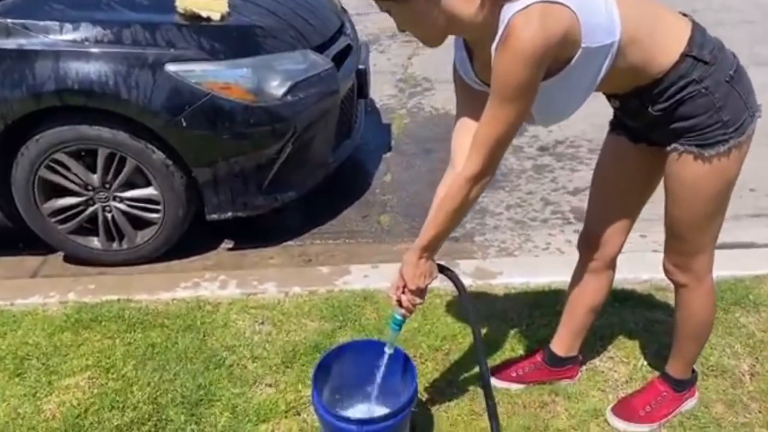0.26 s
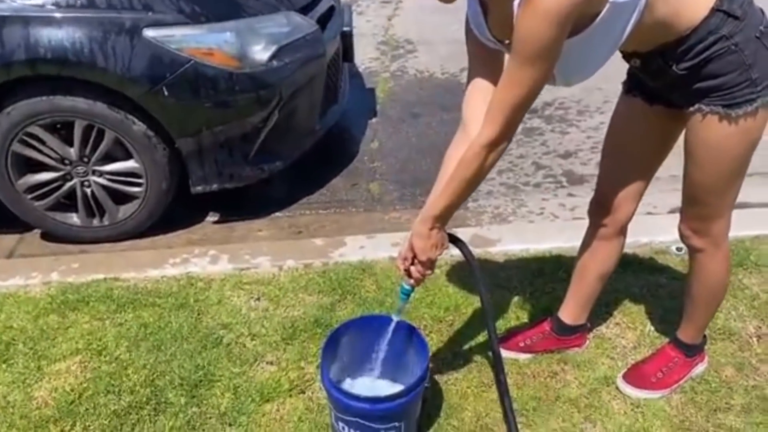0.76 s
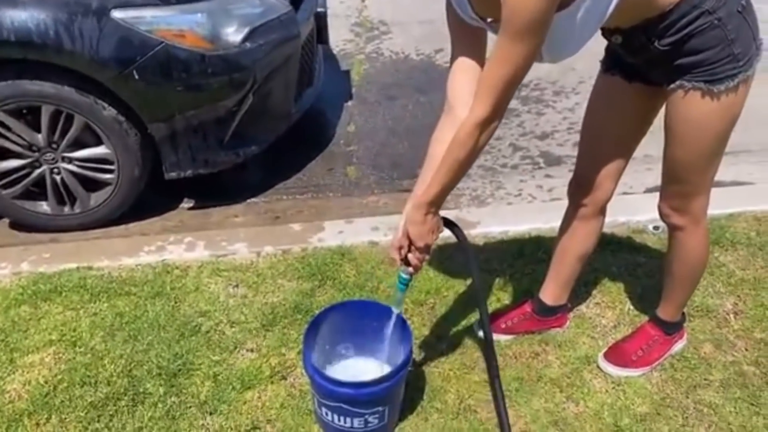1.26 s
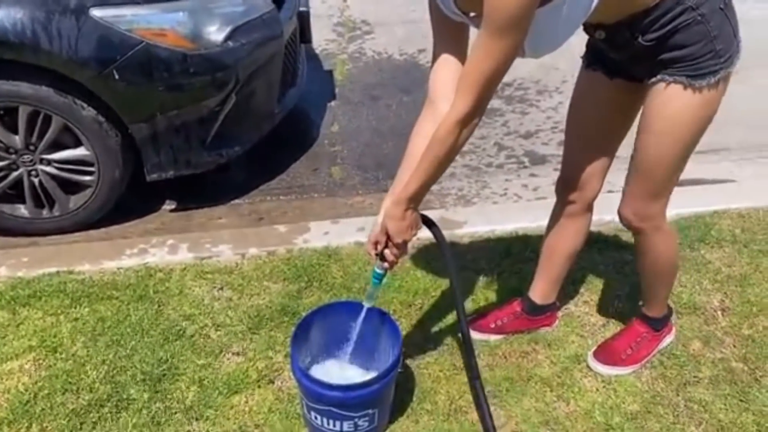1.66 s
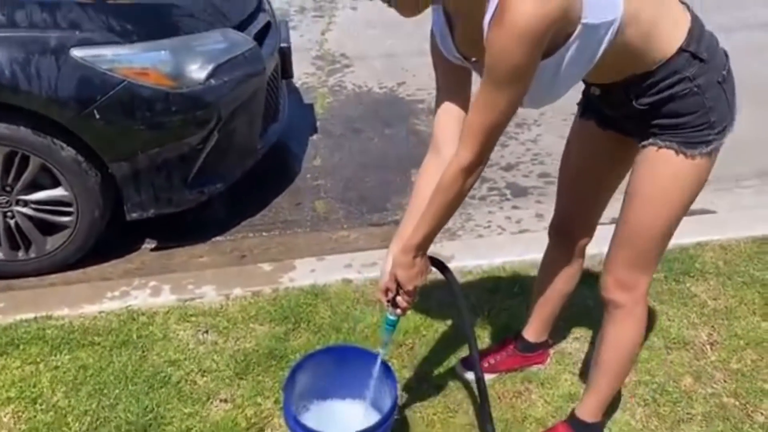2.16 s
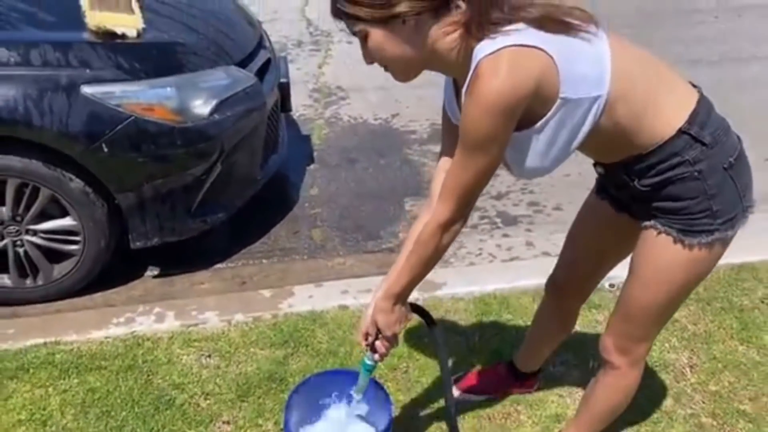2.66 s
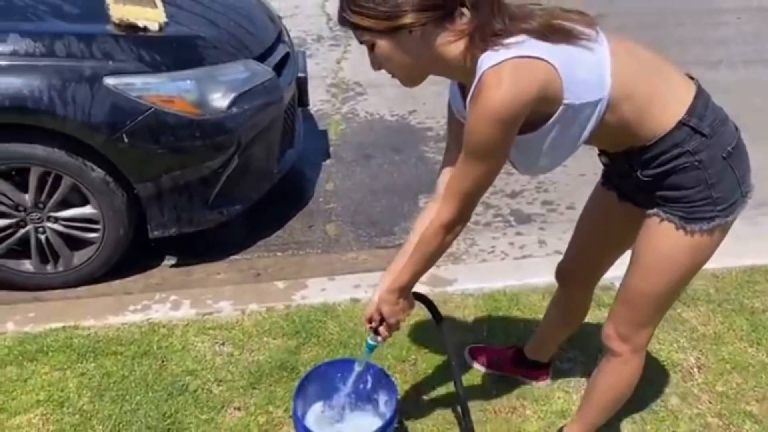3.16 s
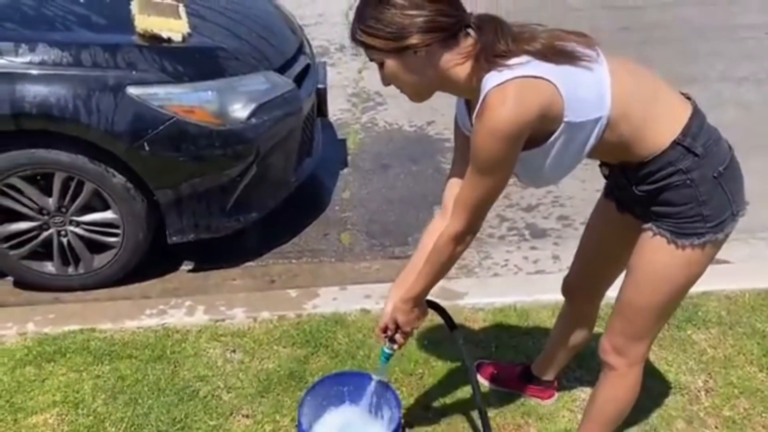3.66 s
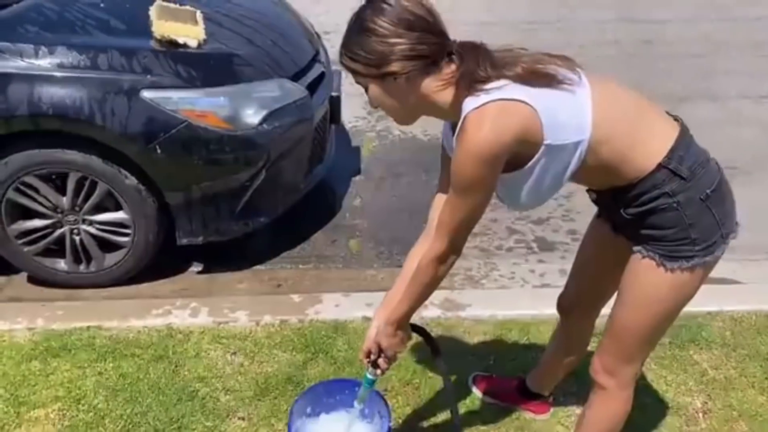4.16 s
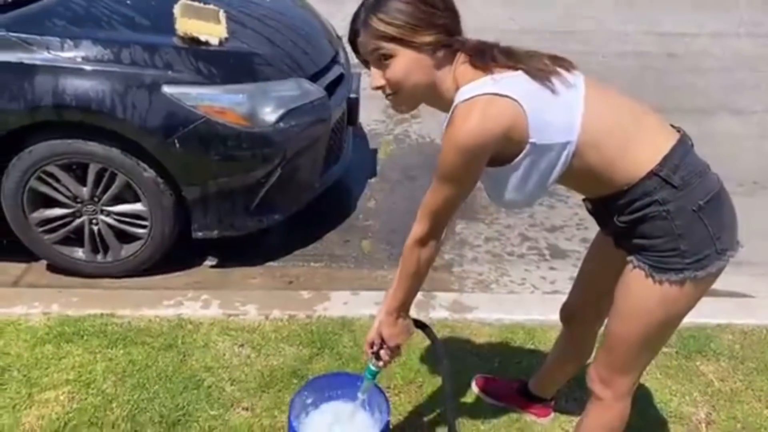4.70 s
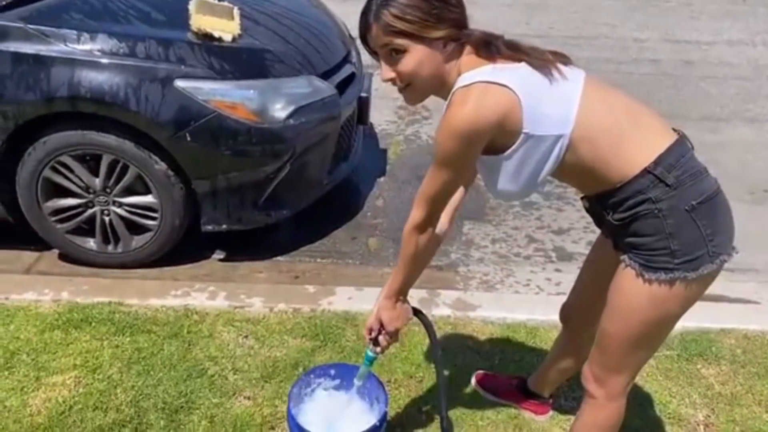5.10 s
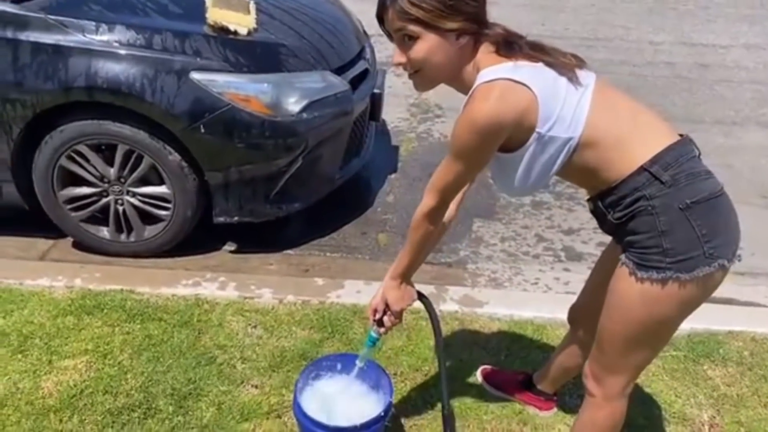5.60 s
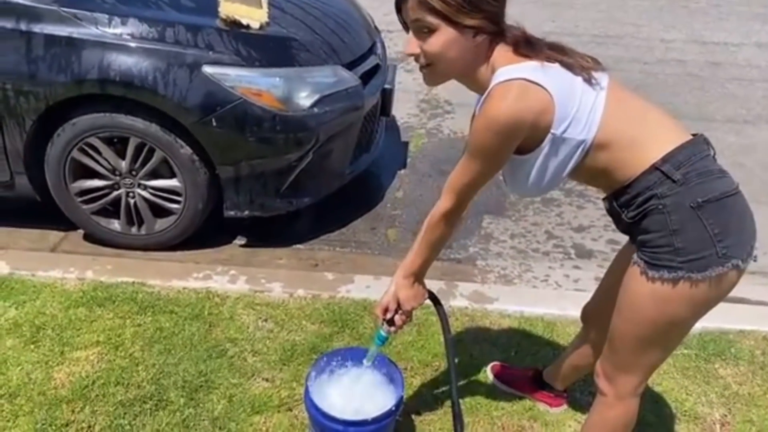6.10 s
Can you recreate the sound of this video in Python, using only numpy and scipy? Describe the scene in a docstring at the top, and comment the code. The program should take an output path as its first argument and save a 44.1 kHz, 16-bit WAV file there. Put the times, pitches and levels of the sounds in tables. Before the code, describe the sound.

Close outdoor stereo pickup of a hose jet filling a plastic bucket. It begins bright and loud, with hiss, spatter and hollow bubbling, then foam gradually muffles it. Irregular surges and small slaps break through around the middle before the water settles to a soft, foamy churn. Wind rumbles and thumps the microphone, strongest near the end.

```python
"""A bright splash and hiss come first: a garden hose jets into a plastic bucket of soapy water on a lawn.
Bubbles ring as damped sines over noise, shaped by resonances of the bucket's air.
Foam builds and smothers the sound, which surges again when the swaying jet breaks through to open water.
Filtered noise makes the hissing spray, the faint open air and the wind, whose eddies thump
a closely spaced stereo microphone."""
import sys
import numpy as np
from scipy import signal
from scipy.fft import rfft, irfft, next_fast_len
from scipy.io import wavfile
from scipy.ndimage import uniform_filter1d, map_coordinates

SR = 44100
rng = np.random.default_rng(int(sys.argv[2]) if len(sys.argv) > 2 else 0)


def wrap_up_sound(samples):
    """Save the sound to the file named by the first command line argument, as 16-bit audio."""
    columns = np.atleast_2d(samples).T
    # keep every value between -1 and 1, then stretch to whole-number steps
    tamed = np.clip(columns, -1, 1)
    steps = np.round(tamed * 32767).astype(np.int16)
    wavfile.write(sys.argv[1], SR, steps)


N = 279902

# Spectrum of the open air. Each row: frequency in Hz, relative gain in dB.
OUTDOORS_SPECTRUM = [(100, -5), (300, -3), (600, 7), (1500, -17), (3000, -38), (8000, -45)]
# Strength of the breeze at the microphone. Each row: time in seconds, relative level in dB.
BREEZE_STRENGTH = [(0, -30), (.68, -32.5), (1.13, -23.5), (1.33, -29), (2.1, -27), (3.45, -34.5),
                   (4.0, -25.5), (5.2, -28), (5.45, -23.5), (6.0, -21.5), (6.35, -20)]
# Gusts on top of the breeze. Each row: start in seconds, length in seconds, lift in dB.
GUST_LIFTS = [(0.21, 0.08, 10), (0.437, 0.061, 9.5), (.78, 0.16, 4), (1.765, 0.19, 5.5),
              (2.138, 0.061, 6.5), (2.38, 0.17, 5.5), (2.673, 0.22, 9), (3.047, 0.08, 8.5),
              (5.433, 0.097, 1.5), (5.75, 0.03, 5.5), (5.892, 0.18, 7.5)]
GUST_ATTACK_S, GUST_RELEASE_S = 0.019, 0.12
# Spectrum of the wind's rumble. Each row: frequency in Hz, relative gain in dB.
RUMBLE_SPECTRUM = [(15, -46), (28, -33), (45, -1.5), (72, 2.5), (108, -0.5), (165, -3), (260, -11.5),
                   (400, -23.5), (900, -72)]
# Gain of the difference between the ports in wind. Each row: frequency in Hz, gain in dB.
WIND_SIDE_GAIN = [(40, -14), (100, -10), (200, -6.5), (400, -2)]
# Single eddies that hit the microphone. Each row: time in seconds, relative level in dB, pitch in Hz.
EDDY_HITS = [(0.248, -2.5, 168), (0.457, -4.5, 124), (0.965, -9, 154), (1.848, -2, 164), (1.862, -7, 136),
             (1.922, -14, 140), (2.509, -13, 64.6), (2.776, -12, 75.4), (3.075, -6.5, 155),
             (3.084, -8.5, 131), (4.571, -6, 185), (5.476, -6, 85), (5.535, -3.5, 110), (5.567, -4.5, 74.5),
             (5.774, 1, 70), (5.859, -3, 69), (5.91, -1.5, 90), (5.948, -2, 119), (6.012, -2, 80),
             (6.039, 2.5, 124), (6.093, -4, 72.7), (6.2, -6, 80), (6.315, -7, 80)]

# Low churning under the jet. Each row: time in seconds, relative level in dB.
CHURN_LEVEL = [(0, -20), (.37, -25.5), (.9, -24), (1.25, -24), (1.5, -31.5), (1.85, -25), (2.2, -25),
               (2.35, -29.5), (2.55, -26), (2.95, -27.5), (3.5, -29), (3.98, -24), (4.2, -29), (4.45, -27),
               (5.5, -27.5), (6.35, -40.5)]
# Colour of the water at four stages. Each row: frequency in Hz, relative gain in dB.
SHALLOW_COLOUR = [(88, -34), (150, -9), (220, -2), (319, -6), (468, -12), (738, -2.5), (1150, -8),
                  (1340, -5.5), (1620, -7), (1860, -9), (2890, -10.5), (4500, -3), (5850, -54),
                  (9900, -120)]
RISING_COLOUR = [(88, -35), (150, 1), (243, -18), (496, -16), (793, 2.5), (996, -3), (1320, -8.5),
                 (1620, -3.5), (2060, -10), (3340, -13.5), (4500, -14), (5850, -58), (9900, -120)]
DEEP_COLOUR = [(88, -35), (150, -34), (260, -7), (330, -0.5), (436, 3), (540, -10), (588, -2), (793, -2.5),
               (954, -4), (1160, -6.5), (2500, -14), (3430, -16), (4500, -6.5), (5850, -52), (9900, -120)]
FOAMY_COLOUR = [(200, 5.5), (300, 0), (410, 0.5), (550, -4), (850, -2.5), (1250, -10.5), (1750, -20),
                (2300, -20.5), (2700, -22.5), (3300, -33), (4500, -54)]
# Resonances of the air above the water, one list for each of these stages.
# Each row: centre in Hz, half-width in Hz, height in dB.
AIR_RESONANCES = [
    [(300, 42, 15.5), (470, 69, -2), (820, 140, -3), (1350, 41, 5), (1660, 92, -3), (1800, 47, 10),
     (1950, 120, 9), (2350, 50, 0), (2564, 120, 10)],
    [(815, 87, -1), (1324, 48, 9.5), (1970, 59, 5.5), (2120, 45, 6), (2370, 61, 9)],
    [(392, 90, -2), (767, 26, 5), (1164, 60, 5), (1330, 48, 2.5), (1590, 35, -1.5), (2250, 58, 1.5),
     (2550, 22, 5)],
    [(380, 46, -0.5), (805, 87, -0.5), (1150, 20, 6), (1540, 100, -1), (1990, 140, 6), (2340, 61, 3.5)],
]
# State of the bucket. Each row: time in seconds, stage from 0 (shallow) to 3 (foamy).
FILL_STAGE = [(0, 0), (.75, 1), (1.35, 2.5), (1.95, 2.5), (2.3, 2), (3.8, 1.5), (4.2, 3), (6.35, 3)]
# The swaying jet breaks through the foam into open water, or sinks into it. Each row: start in seconds,
# length in seconds, change of the splash in dB, of the spatter in dB, of the spray in dB.
JET_PLUNGES = [(0.02, 0.3, 4.5, 2, 4.5), (0.35, 0.17, 5, 3.5, 4), (0.512, 0.28, 6.5, 1.5, 3),
               (0.828, 0.39, 2.5, 2.5, 4), (1.25, 0.71, 6.5, 2.5, 2.5), (1.39, 0.29, 3.5, 3.5, 1),
               (1.56, 0.23, 1.5, 0, 2), (2.02, 0.19, 4, 0.5, 1), (2.19, 0.4, 9, 4.5, 3),
               (2.28, 0.21, -1, 4.5, 3), (2.75, 0.17, -5.5, 4, 0), (3.02, 0.17, 4, 7.5, 5),
               (3.2, .17, 8.5, 4.5, 2), (3.47, 0.038, -4, 2.5, 0), (3.61, 0.22, 9.5, 8.5, 4.5),
               (3.91, 0.082, 6.5, 5, 2), (4.116, 0.44, 0, 2.5, 1.5), (4.7, 0.23, 1, 0, 1),
               (5.4, 0.26, 2, 3, -0.5), (5.79, .04, -2, 1, -1), (5.98, 0.25, 1, 2, -1)]
PLUNGE_ATTACK_S, PLUNGE_RELEASE_S = 0.075, 0.13  # the foam parts, then closes again
# Slugs of water slap the surface. Each row: start in seconds, length in seconds, lift of the splash in dB,
# of the spatter in dB, relative level of the impact in dB, its nominal pitch in Hz.
SLUG_SLAPS = [(1.131, 0.041, 5, 1, -15, 1000), (1.698, 0.027, 2, -4, -11, 1200),
              (2.013, 0.007, 4, 4, -6, 790), (2.304, 0.014, 7, -4, -9, 780),
              (2.453, .008, 6.5, -1, -11, 700), (2.567, .008, -2, -5, -11, 886),
              (2.794, 0.03, 3, 6, -15, 1900), (2.923, .005, -8, -3, -18, 447),
              (3.061, 0.0096, 6.5, 4, -16, 706), (3.117, 0.022, 4, 3, -18, 1210),
              (3.262, 0.035, 2.5, -1.5, -13, 750), (3.35, .015, 3, 0, -17, 800),
              (3.672, 0.0086, 3, 2.5, -14, 1190), (3.742, 0.01, 2.5, 2.5, -13, 1000),
              (3.824, 0.022, 3.5, 1.5, -16, 1000), (5.151, 0.025, 3, -2, -25, 890),
              (5.482, 0.023, 3, 2, -22, 900), (5.742, 0.022, 6, 3.5, -20, 980),
              (6.295, 0.0091, 1.5, 1, -24, 1010)]
SLAP_ATTACK_S, SLAP_RELEASE_S = 0.003, 0.017
# Air pockets that collapse into runs of like-sized bubbles. Each row: start in seconds, length in seconds,
# relative level in dB, nominal pitch in Hz.
POCKET_GULPS = [(0.05, 0.24, -13, 315), (0.422, 0.14, -5.5, 1800), (0.504, 0.093, -6, 1060),
                (0.618, .03, -9.5, 780), (0.706, .03, -11, 1410), (0.822, 0.086, -10.5, 327),
                (.94, 0.15, -10, 1330), (1.67, 0.069, -7, 802), (1.69, 0.084, -5, 1332),
                (1.783, 0.017, -10, 1350), (1.9, 0.056, -13, 478), (2.116, 0.074, -9, 398),
                (2.268, .06, -10.5, 1210), (2.389, 0.078, -11, 1574), (2.676, .1, -14, 266),
                (2.974, 0.028, -11, 415), (3.29, 0.091, -13, 477), (3.722, 0.075, -11, 1160),
                (3.78, 0.11, -14, 425), (4.042, .05, -14, 638), (4.835, 0.081, -15, 437),
                (5.478, 0.055, -15, 370), (5.616, 0.026, -18, 350)]
# Spectrum of the spray's hiss. Each row: frequency in Hz, relative gain in dB.
HISS_GAIN = [(2400, -7.5), (3200, -2), (4000, -4.5), (5000, -6), (6200, -2.5), (6750, -0.5), (7020, 3.5),
             (7250, 1.5), (8000, -1), (9000, -0.5), (11000, 0.5), (13000, 0), (14900, -1.5)]
HEAVE_SHARE, HEAVE_RATE = .012, 5  # typical detuning as a share of pitch, random knots a second

# Phase between the two ports. Each row: frequency in Hz, left-right phase in half turns.
PORT_PHASE = [(1850, 0), (3400, .75), (4300, .55), (5200, -.3), (6400, 0), (7750, 0), (8400, -1),
              (9500, -1), (10500, -2), (11550, -2), (13000, -3), (13600, -3), (14700, -4)]
# Likeness of the ports before blurring. Each row: frequency in Hz, likeness from 0 to 1.
PORT_LIKENESS = [(250, 0.52), (450, 0.33), (750, 0.69), (1200, 0.8), (1700, 1), (2700, 0.5), (3600, 0.27),
                 (4500, 0), (5400, 0.6), (6600, 0.98), (7500, 0.88), (8400, 1)]
# Balance of the ports. Each row: frequency in Hz, left minus right in dB.
PORT_BALANCE = [(300, -0.5), (550, -2), (850, -5), (1200, -4), (1600, -0.5), (2100, -3), (3000, 1),
                (3800, 3), (4500, 5.5), (5400, 3.5), (6500, -0.5), (9000, 0), (15000, 0)]
TOP_HZ = 15100  # the recorder's band limit


def amp(db):
    """Decibels are twenty times the logarithm of an amplitude ratio."""
    return 10 ** (np.asarray(db) / 20)


def unit(x):
    """Dividing by the root mean square sets the mean power to 1."""
    return x / np.sqrt(np.mean(x ** 2) + 1e-20)


def along(points, hz):
    """Spectral values are interpolated on a logarithmic frequency axis."""
    f, v = np.transpose(points)
    return np.interp(np.log(hz + 1), np.log(f + 1), v)


def curves(rows):
    """Linear interpolation in time gives a sample-rate curve for each column after the first."""
    s, *cols = np.transpose(rows)
    return [np.interp(np.arange(N) / SR, s, c) for c in cols]


def wobble(rate):
    """Spline interpolation smooths random knots, rate of them a second."""
    knots = rng.standard_normal(int(N * rate / SR) + 4)
    return map_coordinates(knots, [np.arange(N) * rate / SR])


def filtered(x, response):
    """Linear filtering multiplies the spectrum by a complex response of frequency."""
    m = next_fast_len(N + SR // 4, True)
    return irfft(rfft(x, m) * response(np.fft.rfftfreq(m, 1 / SR)), m)[..., :N]


def band(hz, lo_hz, hi_hz, order=6):
    """A band-pass gain falls as a power law beyond each cutoff."""
    below = 1 + (lo_hz / (hz + 1)) ** (2 * order)
    above = 1 + (hz / hi_hz) ** (2 * order)
    return (below * above) ** -.5


def add(track, s, sound):
    """By superposition, a short sound adds to a track from s seconds on."""
    start = max(round(s * SR), 0)
    track[start:start + len(sound)] += sound[:N - start]


def swell(s, length, attack_s, release_s):
    """A linear envelope rises from 0 towards 1 at s and falls to 0 once its length is over."""
    out = np.zeros(N)
    t = np.arange(int(abs(length + release_s) * SR)) / SR
    rise = t / attack_s
    fall = 1 - (t - length) / release_s
    add(out, s, np.clip(np.minimum(rise, fall), 0, 1))
    return out


def lifts(rows, attack_s, release_s):
    """Overlapping surges add in dB, weighted for each layer by its column."""
    envelopes = np.array([swell(s, length, attack_s, release_s) for s, length, *_ in rows])
    return np.array(rows)[:, 2:].T @ envelopes


def outdoors(level_db=-41):
    """Independent filtered noise at each port forms the diffuse field of open air."""
    noise = rng.standard_normal((2, N))
    return amp(level_db) * unit(filtered(noise, lambda hz: amp(along(OUTDOORS_SPECTRUM, hz))))


def eddies(turns=0.4, level_db=-4.0, low_cut_hz=42):
    """A single eddy is a pressure pulse, a brief damped sine that thumps both ports alike."""
    out, t = np.zeros(N), np.arange(SR // 8) / SR
    for s, db, hz in EDDY_HITS:
        age = hz * t / turns
        push = (age * np.exp(1 - age)) ** 2  # peaks within the first turn and dies in a few more
        add(out, s - .5 / hz, amp(db + level_db) * push * np.sin(2 * np.pi * hz * t))
    return filtered(out, lambda hz: band(hz, lo_hz=low_cut_hz, hi_hz=600, order=3))


def wind(rumble_db=-2, flutter_db=-25, flutter_grows=1.72):
    """Turbulence gives a lumpy rumble, partly unlike at each port; the strongest gusts add higher flutter."""
    breeze_db, = curves(BREEZE_STRENGTH)
    gust_db = sum(db * swell(s, length, GUST_ATTACK_S, GUST_RELEASE_S) for s, length, db in GUST_LIFTS)
    strength_db = breeze_db + gust_db
    flow = filtered(rng.standard_normal((2, N)), lambda hz: amp(along(RUMBLE_SPECTRUM, hz)))
    rumble = amp(rumble_db + strength_db) * unit(flow * amp(1.5 * wobble(40)))
    noise = filtered(rng.standard_normal((2, N)), lambda hz: band(hz, lo_hz=169, hi_hz=293, order=4))
    below_peak_db = strength_db - strength_db.max()
    flutter = amp(flutter_db + flutter_grows * below_peak_db) * unit(noise)
    mid, side = rumble + flutter
    side = filtered(side, lambda hz: amp(along(WIND_SIDE_GAIN, hz)))
    return np.array([mid + side, mid - side]) + eddies()


def grains(rate, lo_hz, hi_hz, cycles, scatter_db, rise, size):
    """Bubbles at random times are damped oscillators whose pitch rises as they near the surface."""
    when, pitch, life, strength = rng.random((int(rate * N / SR), 4)).T[:, :, None]
    hz = lo_hz * (hi_hz / lo_hz) ** pitch
    turns = hz * np.arange(size) / SR
    age = turns / (cycles * (.5 + life))  # at age 1 the ring has fallen 60 dB
    gain = amp(-scatter_db * np.log(1 - .99 * strength))
    tone = np.sin(2 * np.pi * turns * (1 + rise * np.minimum(age, 1) / 2))
    ring = gain * hz * np.exp(-age * np.log(1000)) * tone
    where = (when * N).astype(int) + np.arange(size)
    return unit(np.bincount(where.ravel(), ring.ravel(), N)[:N])


def froth(bubbles, wash_db):
    """Countless small bubbles merge into noise under the distinct ones: (direct, scattered)."""
    wash = rng.standard_normal((2, N))
    return np.array([unit(bubbles + amp(wash_db) * wash[0]), wash[1]])


def sloshing(x, patchy_db):
    """A random time-frequency gain imitates a heaving surface that favours ever-changing pitches."""
    z = signal.stft(x, nperseg=1024)[2]
    field = uniform_filter1d(rng.standard_normal(z.shape[1:]), size=3, axis=0)  # across frequency
    field = uniform_filter1d(field, size=8, axis=1)  # across time
    return signal.istft(z * amp(patchy_db * unit(field)), nperseg=1024)[1][:, :N]


def heaving(pair):
    """A rocking water level drifts all resonances a little, computed as a wavering playback clock."""
    clock = (np.arange(N) + np.cumsum(HEAVE_SHARE * wobble(HEAVE_RATE))) % N
    return np.array([np.interp(clock, np.arange(N), x) for x in pair])


def smothered(covered_db, bare_db, cover_s):
    """Foam absorbs sound: the excess level of bare water decays exponentially as the foam builds."""
    return covered_db + bare_db * np.exp(-np.arange(N) / SR / cover_s)


def in_bucket(source, lo_hz, hi_hz):
    """Resonances of the enclosed air colour one register, crossfading between the bucket's stages."""
    stage, = curves(FILL_STAGE)
    colours = [SHALLOW_COLOUR, RISING_COLOUR, DEEP_COLOUR, FOAMY_COLOUR]
    out = 0
    for k, (colour, modes) in enumerate(zip(colours, AIR_RESONANCES)):
        def response(hz):
            ring_db = sum(db / (1 + ((hz - centre) / width) ** 2) for centre, width, db in modes)
            return amp(along(colour, hz) + ring_db) * band(hz, lo_hz, hi_hz)
        share = np.clip(1 - abs(stage - k), 0, 1)
        out = out + share * unit(filtered(source, response))
    return heaving(out)


def spray(level_db, surge):
    """Very short damped sines, as droplets and bursting foam, fizz over the nozzle's noise."""
    fizz = froth(grains(rate=3000, lo_hz=2980, hi_hz=14700, cycles=1.7, scatter_db=2.0, rise=.1, size=64),
                 wash_db=3.5)
    hiss = unit(filtered(sloshing(fizz, patchy_db=3.0), lambda hz: amp(along(HISS_GAIN, hz))))
    return amp(level_db + 0.34 * surge + 0.14 * wobble(160) + 0.44 * wobble(12)) * hiss


def droplets(lift_db, grows=2.0):
    """Droplets patter on water and wall as brief damped sines, stronger with each plunge's lift."""
    level_db = smothered(covered_db=-50, bare_db=6, cover_s=2.1) + grows * lift_db
    ticks = froth(grains(rate=2600, lo_hz=2820, hi_hz=6200, cycles=10, scatter_db=2.2, rise=0.061, size=220),
                  wash_db=-1)
    return amp(level_db) * unit(filtered(ticks, lambda hz: band(hz, lo_hz=2880, hi_hz=6450)))


def gulps(life=0.056, attack=0.0038, rise=0.086, spread=0.057, loss_db=0.5, count=5):
    """A collapsing air pocket sheds damped oscillators of nearly one pitch, each weaker than the last."""
    out, t = np.zeros(N), np.arange(SR // 8) / SR
    for s, length, db, hz in POCKET_GULPS:
        for k, (delay, detune) in enumerate(rng.uniform(-1, 1, (count, 2))):
            bubble_hz = hz * (1 + spread * detune)
            ring = np.sin(2 * np.pi * bubble_hz * t * (1 + rise * t / life / 2))
            decay = amp(db - loss_db * k - 60 * t / life)  # 60 dB in a life (s)
            onset = s + length * (k + delay / 2 * (k > 0)) / count
            add(out, onset, decay * (1 - np.exp(-t / attack)) * ring)
    return np.array([out, np.zeros(N)])


def impacts(life=0.03, attack=0.00073, spread=1.53, detune=0.073, level_db=-4):
    """A slug's cavity snaps shut into three damped bubbles, the higher ones dying faster."""
    out, t = np.zeros(N), np.arange(SR // 16) / SR
    for s, *_, db, hz in SLUG_SLAPS:
        pitches = hz * np.array([1 / spread, 1, spread]) * (1 + detune * rng.uniform(-0.85, 1, 3))
        ring = sum(np.sin(2 * np.pi * (f * t + rng.random())) * amp(-60 * t * f / hz / life)
                   for f in pitches)
        add(out, s, amp(db + level_db) * (1 - np.exp(-t / attack)) * ring)
    return np.array([out, np.zeros(N)])


def water():
    """Bubble pitch falls with size: large ones churn, middling ones splash, drops spatter, all unevenly."""
    churn_db, = curves(CHURN_LEVEL)
    splash_lift, spatter_lift, spray_lift = lifts(JET_PLUNGES, PLUNGE_ATTACK_S, PLUNGE_RELEASE_S)
    splash_slap, spatter_slap = lifts([row[:4] for row in SLUG_SLAPS], SLAP_ATTACK_S, SLAP_RELEASE_S)
    splash_db = smothered(covered_db=-37.5, bare_db=15.0, cover_s=2.4) + splash_lift + splash_slap
    spatter_db = smothered(covered_db=-38.0, bare_db=20.5, cover_s=1.625) + spatter_lift + spatter_slap
    spray_db = smothered(covered_db=-29.0, bare_db=7.0, cover_s=0.56) + spray_lift
    surge = wobble(70)
    patter = wobble(320)

    large = froth(grains(rate=500, lo_hz=193.8, hi_hz=707, cycles=23.6, scatter_db=1.2, rise=0.28, size=2600),
                  wash_db=6)
    middling = froth(grains(rate=2000, lo_hz=453.8, hi_hz=1901, cycles=18, scatter_db=2.8, rise=0.13,
                            size=1100), wash_db=4)
    drops = froth(grains(rate=2400, lo_hz=1219.5, hi_hz=3980, cycles=30, scatter_db=2.6, rise=0.078,
                         size=700), wash_db=2)

    churn = in_bucket(sloshing(large, patchy_db=0.7), lo_hz=238, hi_hz=574)
    churn = amp(churn_db - 1.2 + .5 * wobble(25)) * churn
    splash = in_bucket(sloshing(middling, patchy_db=2.0), lo_hz=536, hi_hz=1495)
    splash = amp(splash_db + 0.16 * surge + 0.38 * patter) * splash
    spatter = in_bucket(sloshing(drops, patchy_db=3.0), lo_hz=1390, hi_hz=3560)
    spatter = amp(spatter_db + 0.45 * surge + .6 * patter) * spatter
    return churn + splash + spatter + spray(spray_db, surge) + droplets(spray_lift)


def microphones(pair, blur=0.69):
    """Two close ports mix direct and scattered sound; phase and coherence between them vary with pitch."""
    def spread(hz):
        phase = np.pi * along(PORT_PHASE, hz)
        blurred = blur * np.sin(phase) ** 2 * (hz > PORT_PHASE[4][0])  # only in the treble
        alike = along(PORT_LIKENESS, hz) * (1 - blurred)
        turn = np.arccos(np.clip(alike, 0, 1)) / 2  # mixing angle that yields this likeness
        lean = amp(along(PORT_BALANCE, hz) / 2) * np.exp(.5j * phase)
        left = [np.cos(turn) * lean, np.sin(turn) * lean]
        right = [np.cos(turn) / lean, -np.sin(turn) / lean]
        return np.array([left, right])
    return filtered(pair, spread).sum(axis=1)


def scene():
    """Pressures superpose: the open air, the wind and the water in the bucket add up."""
    return outdoors() + wind() + microphones(water() + gulps() + impacts())


def record(dry):
    """Clipping limits the amplitude at full scale, then a band limit removes all higher frequencies."""
    return filtered(np.clip(dry, -1, 1), lambda hz: hz < TOP_HZ)


dry = scene()
out = record(dry)
wrap_up_sound(out)
```